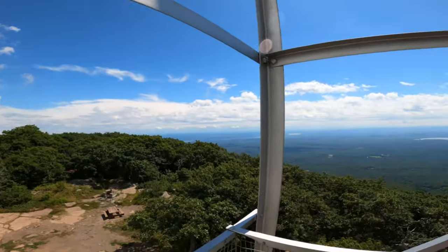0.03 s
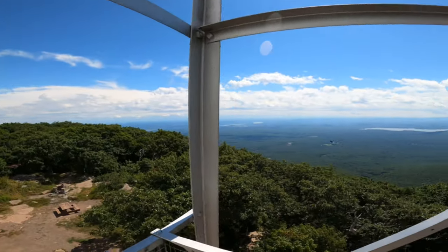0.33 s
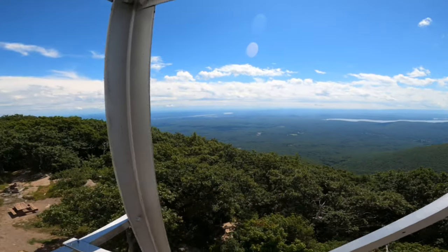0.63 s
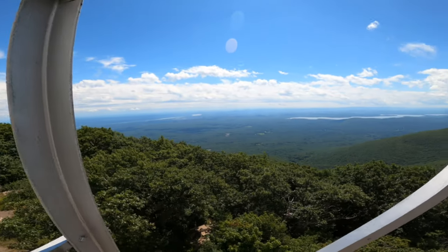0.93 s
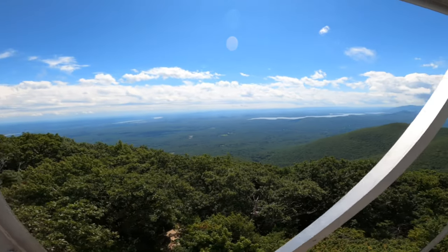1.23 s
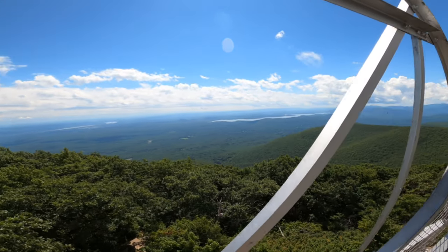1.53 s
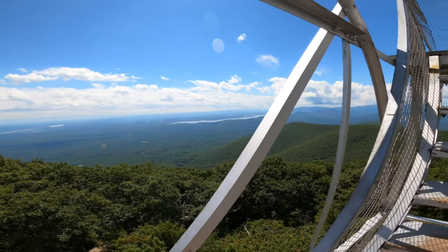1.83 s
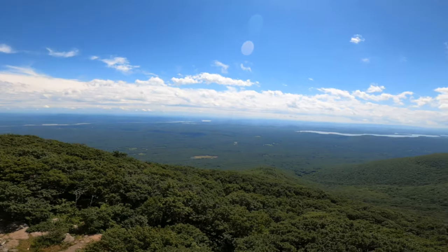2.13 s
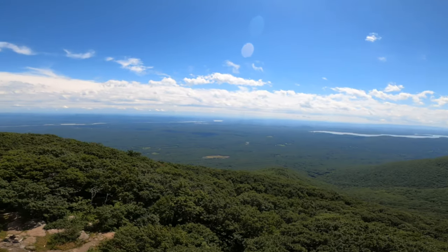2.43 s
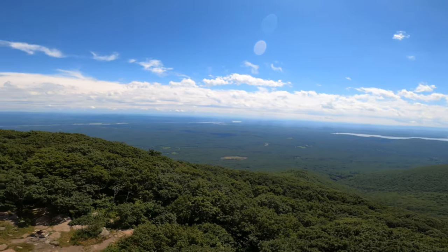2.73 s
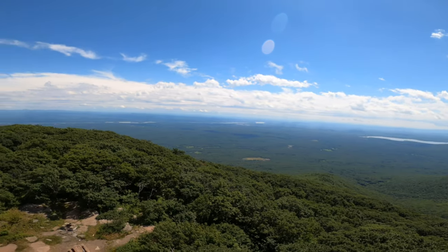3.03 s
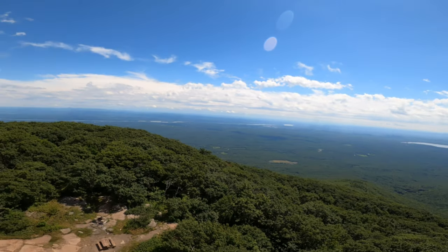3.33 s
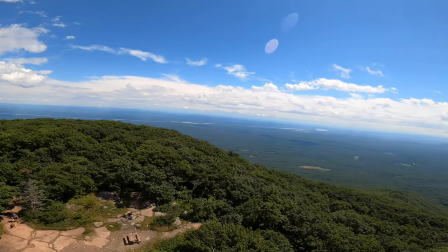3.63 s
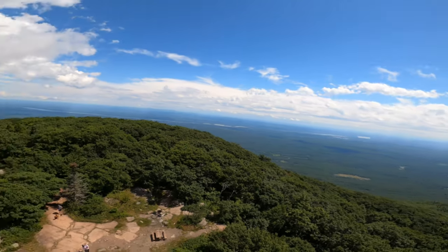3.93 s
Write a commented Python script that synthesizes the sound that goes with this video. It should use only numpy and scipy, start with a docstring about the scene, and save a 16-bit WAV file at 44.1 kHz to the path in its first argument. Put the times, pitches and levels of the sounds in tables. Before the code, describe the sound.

Wind thumps the microphone as cloth rustles, cuts out briefly, then rumbles back harder.

```python
"""A lookout tower above a forest, in gusty wind: two scenes with a short silence between them.
First, in stereo, swirls of air thump each microphone opening, while a jacket rustles close by,
rubs on the camera and catches on it in a scuff that makes the case ring.
Then, almost in mono, heavy wind rumbles and slaps over a faint rush of trees,
with a thin whistle, soft slides of the grip and a few faint, crisp high ticks."""
import sys
import numpy as np
from scipy import signal
from scipy.fft import rfft, irfft, next_fast_len
from scipy.io import wavfile
from scipy.ndimage import uniform_filter1d, map_coordinates

SR = 44100
rng = np.random.default_rng(int(sys.argv[2]) if len(sys.argv) > 2 else 0)


def transcribe(signal):
    """Save signal, clipped to [-1, 1], as a 16-bit WAV file at the path in sys.argv[1]."""
    frames = np.atleast_2d(signal).T
    limited = np.clip(frames, -1, 1)
    pcm = np.round(limited * 32767).astype(np.int16)
    wavfile.write(sys.argv[1], SR, pcm)


N = 176400
T = np.arange(N) / SR
HZ = np.fft.rfftfreq(next_fast_len(N + 8192), 1 / SR)


def amp(db):
    """Turn decibels into a gain."""
    return 10 ** (np.asarray(db) / 20)


def unit(x):
    """Scale to an average (rms) level of 1."""
    return x / np.sqrt(np.mean(x ** 2) + 1e-20)


def along(points):
    """Join (Hz, value) points on a log frequency axis."""
    hz, values = np.transpose(points)
    return np.interp(np.log(HZ + 1), np.log(hz + 1), values)


def curves(rows):
    """Join the rows over time: one curve for each column after the first."""
    times, *columns = np.transpose(rows)
    return [np.interp(T, times, column) for column in columns]


def wobble(rate):
    """A smooth curve through `rate` random values a second."""
    return map_coordinates(rng.standard_normal(8192), [T * rate], mode="mirror")


def filtered(x, response):
    """Give each frequency in x its own gain."""
    size = 2 * (len(HZ) - 1)
    return irfft(rfft(x, size) * response, size)[..., :N]


def soften(x, top_hz=9500):
    """Turn down the treble above top_hz."""
    return filtered(x, 1 / np.sqrt(1 + (HZ / top_hz) ** 10))


def noise(tone):
    """Noise shaped by a table of (Hz, dB) points."""
    return unit(filtered(rng.standard_normal(N), amp(along(tone))))


def band(hz, octaves):
    """Noise gathered around one pitch."""
    peak = 1 / (1 + (np.log2((HZ + 1) / hz) / octaves) ** 2)
    return unit(filtered(rng.standard_normal(N), peak / (1 + (HZ / hz / 2) ** 2)))


def burst(start, attack_s, decay_s):
    """A quick rise, then a fall of 60 dB in decay_s."""
    age = np.maximum(T - start, 0)
    return (1 - np.exp(-age / attack_s)) * np.exp(-np.log(1000) * age / decay_s)


def swell(middle, width_s):
    """A smooth rise and fall."""
    return np.exp(-((T - middle) / width_s) ** 2 / 2)


# Narrow pitches at which the camera body rings: f/Hz, width/Hz, boost/dB
BODY_PEAKS = [(1220, 20, -5), (1318, 44, 0.5), (1647, 8.7, 11), (1750, 50, 5), (2335, 79, 5),
              (2715, 35, 4.5), (3010, 17, 8.5), (3250, 30, 2), (4550, 45, 3), (5040, 52, 7),
              (7660, 330, 4.5)]
# How alike left and right sound: f/Hz, likeness (1 = the same)
LIKENESS = [(100, 1), (500, 0.87), (1400, 0.81), (2600, 0.72), (5000, 0.32), (9000, 0.26)]
# How much louder the left is: f/Hz, level/dB
LEFT_LOUDER = [(200, -0.5), (550, 1.5), (1400, 2.5), (2800, 5), (5000, 2), (8000, 1)]
# How far the left is ahead: f/Hz, phase/rad
LEFT_AHEAD = [(100, 0.4), (700, -0.31), (2900, -0.57), (4100, 0.43), (5200, 0.2)]

def friction(tone, grain_db, grain_rate, patchy_db):
    """Grainy rubbing of cloth just left of the camera, coloured by the camera body."""
    spectra = signal.stft(rng.standard_normal((2, N)), nperseg=512)[2]
    patches = rng.standard_normal(spectra.shape[1:])  # loud and soft spots in pitch and time
    patches = uniform_filter1d(patches, size=6, axis=0)
    patches = uniform_filter1d(patches, size=12, axis=1)
    pair = signal.istft(spectra * amp(patchy_db * unit(patches)), nperseg=512)[1][:, :N]
    pair = pair * amp(grain_db * wobble(grain_rate))
    body = amp(sum(db / (1 + (2 * (HZ - hz) / width) ** 2) for hz, width, db in BODY_PEAKS))
    spread = np.arccos(np.clip(along(LIKENESS), -1, 1)) / 2
    mid, side = filtered(pair, body * amp(along(tone)) * np.array([np.cos(spread), np.sin(spread)]))
    lean = amp(along(LEFT_LOUDER) / 2) * np.exp(1j * along(LEFT_AHEAD) / 2)
    return unit(filtered(np.array([mid + side, mid - side]), np.array([lean, 1 / lean])))


# Wind at the microphone: t/s, level/dB, left minus right/dB
BREEZE = [(0, -37, -8.5), (.1, -21.5, -13.5), (.19, -34.5, -6), (.32, -27, 8.5), (.37, -30.5, -3),
          (.42, -33, 15.5), (.5, -23.5, 2.5), (.56, -19, -6), (.63, -26.5, 4.5), (.74, -33.5, 3),
          (.81, -24.5, 6.5), (.92, -30, 2), (1.1, -27.5, 1), (1.22, -29.5, -0.5), (1.44, -32.5, -3),
          (1.6, -28, -7), (1.8, -33, 3), (1.89, -39, -4), (1.96, -33.5, -2), (2.01, -39.5, -4.5)]
# Its deep tone: f/Hz, level/dB
BREEZE_TONE = [(12, -14), (25, 3), (45, 3), (75, -3.5), (130, -11.5), (200, -17), (300, -44), (500, -43.5),
               (1000, -65.5), (3000, -120)]

def breeze(gain_db=1, lump_db=2):
    """Air churns separately at the left and right microphone openings."""
    wind_db, pan_db = curves(BREEZE)
    sides = []
    for sign in (1, -1):
        churn = unit(noise(BREEZE_TONE) * amp(lump_db * wobble(24.45)))
        sides.append(amp(wind_db + gain_db + sign * pan_db / 2) * churn)
    return np.array(sides)


# Loudness of the rustling jacket: t/s, level/dB
RUSTLE = [(0, -37.5), (.13, -44.5), (.165, -41.5), (.2, -39.5), (.29, -38), (.41, -46.5), (.44, -42.5),
          (.6, -42), (.65, -40), (.83, -42), (.915, -49), (.94, -39), (.97, -43), (1, -38), (1.05, -44),
          (1.09, -36.5), (1.15, -49), (1.185, -39.5), (1.27, -50), (1.31, -41), (1.39, -37.5),
          (1.51, -49.5), (1.56, -47), (1.7, -56), (1.88, -57), (1.915, -49.5), (2.01, -59)]
# Its tone: f/Hz, level/dB
RUSTLE_TONE = [(100, -18.5), (300, -1.5), (500, -1.5), (750, -7.5), (1000, 0.5), (1350, 5.5), (2000, 0.5),
               (3000, 2), (3900, 2), (4500, -2.5), (5050, -5), (5900, -10), (7500, -15.5), (8300, -20),
               (10200, -25), (10900, -29.5), (12600, -30.5), (15000, -56)]

def rustle():
    """The jacket's cloth rustles as it moves."""
    return amp(curves(RUSTLE)[0] - 1) * friction(RUSTLE_TONE, grain_db=1, grain_rate=250, patchy_db=3)


# Loudness of the rubbing: t/s, level/dB
RUB = [(0, -42.5), (.35, -47.5), (.5, -38.5), (.57, -45), (.68, -39.5), (.8, -47.5), (1.04, -56),
       (1.1, -45), (1.16, -45.5), (1.29, -49.5), (1.4, -46), (1.55, -51), (1.75, -54), (1.86, -53),
       (2.01, -54.5)]
# Its tone: f/Hz, level/dB
RUB_TONE = [(100, -22), (250, 5), (450, -1.5), (700, -7.5), (920, -7), (1080, 0.5), (1320, 2), (1750, -6),
            (2100, -6), (3200, -47), (5000, -38.5), (8000, -52.5), (14000, -83)]

def rub():
    """Cloth drags against the camera with a low sound."""
    return amp(curves(RUB)[0]) * friction(RUB_TONE, grain_db=-0.5, grain_rate=140, patchy_db=0.5)


# Single swirls of air: t/s, level/dB, half width/s, left minus right/dB
SWIRLS = [(0.095, -14, 0.003, -18), (0.1089, -4.5, 0.0031, -26), (.123, -7.5, 0.0034, -17),
          (0.413, -12, 0.0062, 27), (.808, -15, 0.0045, 23), (0.894, -14, 0.0037, 7),
          (1.098, -14, 0.0044, -10), (1.609, -16, 0.011, -14), (1.661, -8, 0.0051, -28),
          (2.684, -10, .0025, 0), (2.926, -7, 0.0077, -4.5), (3.119, -7, 0.0027, 0),
          (3.229, -8.5, 0.0041, 1.5), (3.245, -10, .003, -7), (3.578, -7, 0.0028, -6)]

def swirls(skew=0.81):
    """A swirl crossing a microphone opening pushes, sucks hard and pushes again."""
    thumps = np.zeros((2, N))
    for middle, db, width, pan_db in SWIRLS:
        u = (T - middle) / width
        pressure = (2 * u * u - 1 - skew * u) / (1 + u * u / 2) ** 4  # skew favours the first push
        sides = amp(np.minimum([[pan_db], [-pan_db]], 0))
        thumps += amp(db) * sides * pressure
    return thumps


# Quick slides of the cloth: t/s, level/dB, decay/s
SWISHES = [(.153, -38.5, 0.074), (.22, -47.5, 0.14), (.276, -36.5, 0.074), (.426, -42.5, 0.14),
           (.487, -49, 0.22), (0.564, -37.5, 0.057), (0.732, -44, 0.32), (.825, -41.5, 0.15),
           (.928, -48.5, 0.17), (1.175, -51, .1), (1.39, -48, 0.18), (1.546, -54, 0.093)]
# Their tone: f/Hz, level/dB
SWISH_TONE = [(1000, -28), (3500, -9), (5000, 10), (6000, -12.5), (7600, -7.5), (8500, -13), (10200, -12.5),
              (11000, -24), (12600, -20.5), (15000, -43)]

def swishes(attack_s=0.0014):
    """Each quick slide of cloth gives a bright hiss that dies away."""
    level = sum(amp(db) * burst(start, attack_s, decay) for start, db, decay in SWISHES)
    return level * friction(SWISH_TONE, grain_db=0.5, grain_rate=420, patchy_db=1.2)


# Moments when the cloth catches: t/s, level/dB, decay/s, extra ringing/dB
CATCHES = [(.497, -27, 0.025, -6), (1.063, -31.5, .03, 3), (1.08, -23.5, 0.045, 2),
           (1.094, -25.5, 0.044, 1), (1.1061, -26.5, 0.04, 1), (1.113, -27.5, 0.039, -2),
           (1.175, -29, 0.026, -6.5)]
# Tone of the scrape: f/Hz, level/dB
SCRAPE_TONE = [(100, -35.5), (450, -6), (700, -13.5), (1050, -6), (1330, 7.5), (1550, -15), (2200, -13),
               (3500, -16), (4500, -19), (7000, -36.5), (14000, -65)]
# Notes of the camera case: f/Hz, level/dB, decay/s
CASE_NOTES = [(470, -3.5, 0.024), (1314, 2.5, .032), (1743, -10, 0.034)]
# Tone of the gritty snap: f/Hz, level/dB
SNAP_TONE = [(200, -14), (450, 3), (900, -4.5), (1700, -0.5), (3500, -6.5), (5500, -15), (9000, -32),
             (15000, -69)]

def scuff(snap_db=-4.5, left_db=3):
    """Cloth sticks and slips: each catch snaps, scrapes and briefly rings the camera case."""
    scrape, snap, ring = np.zeros((3, N))
    for start, db, decay, ring_db in CATCHES:
        scrape += amp(db) * burst(start, attack_s=0.003, decay_s=decay)
        snap += amp(db + snap_db) * burst(start, attack_s=0.00027, decay_s=0.011)
        for hz, note_db, note_decay in CASE_NOTES:
            note = burst(start, 0.0012, note_decay) * np.sin(2 * np.pi * hz * (T - start))
            ring += amp(db + ring_db + note_db + rng.normal(0, 1)) * note
    cloth = friction(SCRAPE_TONE, grain_db=-5, grain_rate=280, patchy_db=0.2)
    knock = ring + snap * noise(SNAP_TONE)
    return scrape * cloth + knock * amp([[left_db / 2], [-left_db / 2]])


# Loudness of the rough slides: t/s, level/dB
RASP = [(.55, -66.5), (.65, -42.5), (.8, -44), (.9, -79), (1.01, -42.5), (1.1, -61), (1.38, -66),
        (1.55, -82.5)]
# Their tone: f/Hz, level/dB
RASP_TONE = [(1500, -20), (2400, -1), (2980, -2.5), (3500, -8.5), (4500, -30), (14000, -76)]

def rasp():
    """Cloth slides with a coarse, grainy sound."""
    return amp(curves(RASP)[0] - 2.5) * friction(RASP_TONE, grain_db=5, grain_rate=260, patchy_db=4.5)


# Heavy wind: t/s, rumble level/dB, flutter level/dB
GALE = [(2.28, -27.5, -42), (2.32, -21.5, -29), (2.42, -16.5, -25), (2.52, -22, -24), (2.58, -16, -30),
        (2.69, -16.5, -21.5), (2.78, -15, -23), (2.86, -17.5, -25), (2.925, -13, -25), (2.98, -17.5, -30),
        (3.05, -17.5, -25.5), (3.09, -18.5, -33), (3.13, -16, -20.5), (3.17, -22.5, -27.5),
        (3.24, -12.5, -22.5), (3.31, -15, -27.5), (3.38, -26, -33.5), (3.44, -16.5, -34), (3.53, -23, -31),
        (3.555, -12, -24), (3.582, -9, -24.5), (3.62, -17.5, -31), (3.69, -12.5, -29), (3.75, -24.5, -47),
        (3.85, -23.5, -44), (3.93, -31.5, -39.5), (4, -11.5, -57)]
# Tone of the rumble: f/Hz, level/dB
RUMBLE_TONE = [(10, -16.5), (22, -2), (45, 3), (85, -1), (125, -5.5), (200, -31.5), (400, -58),
               (1000, -120)]
# Tone of the flutter: f/Hz, level/dB
FLUTTER_TONE = [(50, -37), (100, 1.5), (145, 3), (210, -3.5), (330, -15), (500, -26.5), (650, -33.5),
                (1000, -49), (2000, -68), (5000, -90), (9000, -120)]
# Tone of the tearing sound: f/Hz, level/dB
TEARING_TONE = [(200, -20.5), (440, 4), (800, -19), (2000, -41), (6000, -120)]

def gale(lump_db=1.94, flicker_db=1, tearing_db=-23, tearing_growth=2.8):
    """Wind beats on the microphone: a deep rumble, a faster flutter and tearing as gusts peak."""
    deep_db, fast_db = curves(GALE)
    rumble = amp(deep_db) * unit(noise(RUMBLE_TONE) * amp(lump_db * wobble(15)))
    flutter = amp(fast_db + 1) * unit(noise(FLUTTER_TONE) * amp(flicker_db * wobble(70)))
    edge_db = fast_db.max() + tearing_db + tearing_growth * (fast_db - fast_db.max())
    tearing = amp(edge_db + 5.4 * wobble(99)) * noise(TEARING_TONE)
    return rumble + flutter + tearing


# Wind in the trees: t/s, rush level/dB, hiss level/dB
TREES = [(2.26, -59.5, -75), (2.32, -60.5, -69.5), (2.41, -53, -65.5), (2.54, -59, -73), (2.7, -56, -76),
         (2.9, -57, -75), (3.03, -54, -75.5), (3.25, -56, -72), (3.42, -56, -74.5), (3.55, -61, -71),
         (3.68, -61, -71), (3.75, -65, -73.5), (3.8, -61.5, -77), (3.87, -67.5, -75.5), (3.93, -67, -73.5)]
# Tone of the rush: f/Hz, level/dB
RUSH_TONE = [(200, -8.5), (360, -1.5), (520, -1.5), (700, -2), (1250, -2.5), (1900, -8.5), (2600, -16.5),
             (4000, -22), (7000, -36), (12000, -79)]
# Tone of the leaves' hiss: f/Hz, level/dB
HISS_TONE = [(1000, -19.5), (3000, -3), (4300, -3.5), (5800, -3.5), (7000, -9), (8600, -10.5),
             (9600, -27.5), (14000, -56.5)]

def trees(rush_flicker_db=1.63, hiss_flicker_db=2.5):
    """Wind through the trees makes a soft rush and a fine leafy hiss."""
    rush_db, hiss_db = curves(TREES)
    rush = amp(rush_db + rush_flicker_db * wobble(120)) * noise(RUSH_TONE)
    hiss = amp(hiss_db + hiss_flicker_db * wobble(200)) * noise(HISS_TONE)
    return rush + hiss


# Tone of the crackles: f/Hz, level/dB
CRACKLE_TONE = [(1000, -22.5), (3000, 4), (6000, 3), (8500, -10.5), (11000, -24.5), (15000, -48)]

def crackles(per_second=12, base_db=-69, spread_db=4.5):
    """Faint crackles come at random."""
    hits = rng.random(N) < per_second / SR
    size = np.minimum(rng.exponential(size=N), 3)
    return filtered(hits * amp(base_db + spread_db * size), amp(along(CRACKLE_TONE)))


# Soft slides and a squeak of the grip: t/s, level/dB, half width/s, f/Hz, width/octaves
GRIP_SLIDES = [(2.294, -56.5, 0.013, 1490, 0.37), (2.33, -52.5, 0.014, 1500, .4),
               (2.40, -59, 0.027, 2410, 0.66), (3.931, -57, 0.01, 1540, 0.15)]

def grip():
    """A hand slides softly on the camera."""
    return soften(sum(amp(db) * swell(middle, width) * band(hz, octaves)
                      for middle, db, width, hz, octaves in GRIP_SLIDES))


# Faint, crisp high ticks: t/s, level/dB, decay/s, f/Hz, width/octaves
TICKS = [(2.383, -62, .006, 7500, .7), (2.454, -64, 0.023, 6500, 0.16), (2.812, -58, 0.016, 3040, .35),
         (2.824, -54.5, 0.03, 2780, 0.54), (2.922, -65.5, 0.029, 4760, 0.4),
         (3.012, -50.5, 0.023, 2110, 0.49), (3.235, -58.5, 0.012, 7500, .7),
         (3.419, -67, 0.0075, 7500, 0.59), (3.541, -65, .005, 7700, .8), (3.556, -67, .008, 5500, 0.7),
         (3.656, -71, .025, 5500, 0.4), (3.698, -67.5, 0.033, 3080, 0.17), (3.8, -74, .006, 7460, 0.64)]

def ticks(attack_s=0.00067, gain_db=6):
    """Each tick is a tiny burst of high noise."""
    return soften(sum(amp(db + gain_db) * burst(start, attack_s, decay) * band(hz, octaves)
                      for start, db, decay, hz, octaves in TICKS))


# Slaps of the strongest gusts: t/s, level/dB, half width/s
SLAPS = [(2.617, -27, 0.0062), (2.677, -20, 0.0054), (2.726, -27.5, .006), (2.78, -21.5, 0.0052),
         (3.054, -27.5, 0.0061), (3.122, -27, 0.005), (3.141, -24, 0.0067), (3.179, -30.5, 0.0056),
         (3.218, -26.5, 0.0095), (3.562, -23.5, 0.0071), (3.581, -33, 0.0058)]
# Their tone: f/Hz, level/dB
SLAP_TONE = [(80, -16), (170, 3.5), (300, 3), (420, -6), (580, -16.5), (750, -28.5), (1200, -45.5),
             (3000, -79.5), (6000, -120)]

def slaps():
    """For a few milliseconds a gust hits the microphone opening head-on."""
    return sum(amp(db) * swell(middle, width) for middle, db, width in SLAPS) * noise(SLAP_TONE)


# Loudness of the whistle: t/s, level/dB
WHISTLE = [(3.17, -82), (3.25, -63.5), (3.32, -71), (3.43, -89)]

def whistle():
    """One thin, airy whistle swells and fades."""
    sounding = (T > WHISTLE[0][0]) * (T < WHISTLE[-1][0])
    return amp(curves(WHISTLE)[0]) * sounding * band(hz=3410, octaves=0.11)


def scene(stop_s=2.013, resume_s=2.252, fade_s=0.051):
    """Breeze and jacket, a short silence, then the gale fades in; swirls thump in both scenes."""
    first = np.clip((stop_s - T) / .002, 0, 1)
    second = np.clip((T - resume_s) / fade_s, 0, 1) ** 2
    breezy = breeze() + rustle() + rub() + swishes() + scuff() + rasp()
    stormy = gale() + trees() + crackles() + grip() + ticks() + slaps() + whistle()
    return first * breezy + second * stormy + (first + second) * swirls()


def record(dry, top_hz=15600):
    """The camera picks up nothing above top_hz."""
    return filtered(dry, HZ < top_hz)


dry = scene()
out = record(dry)
transcribe(out)
```